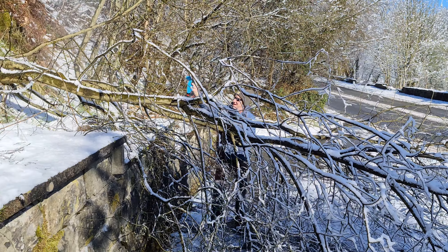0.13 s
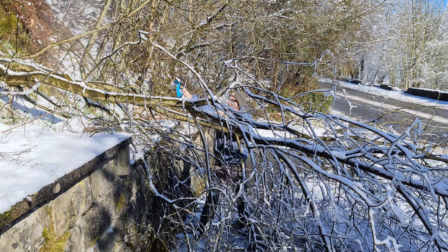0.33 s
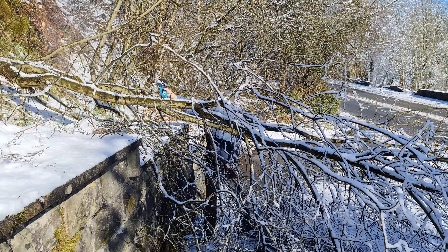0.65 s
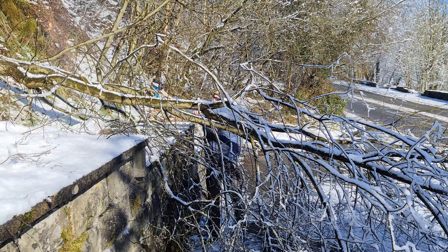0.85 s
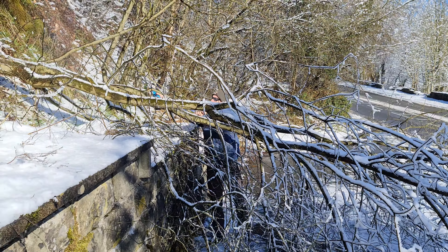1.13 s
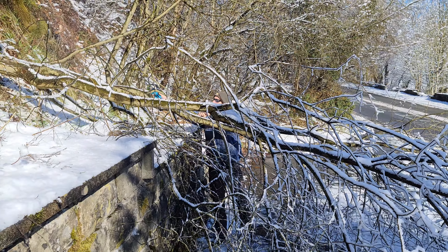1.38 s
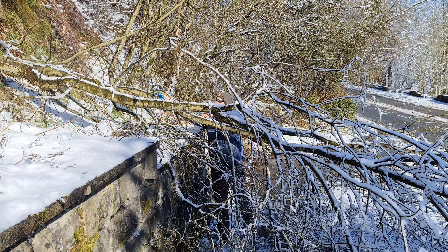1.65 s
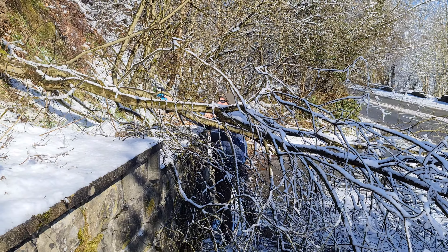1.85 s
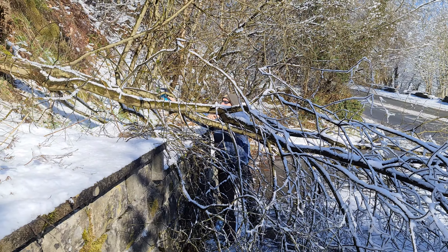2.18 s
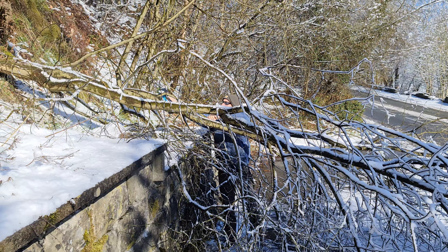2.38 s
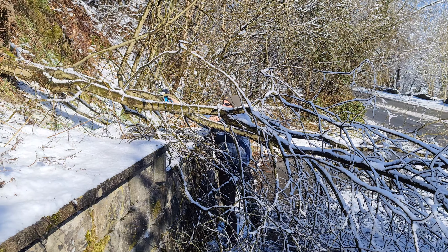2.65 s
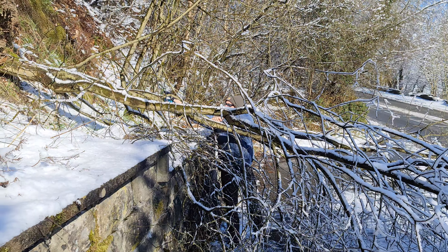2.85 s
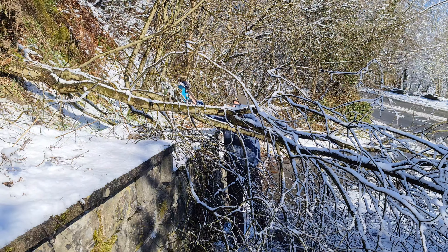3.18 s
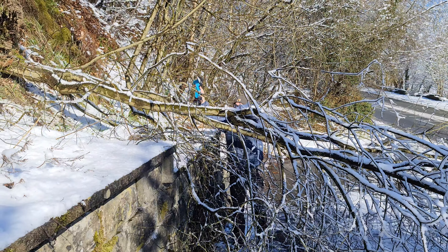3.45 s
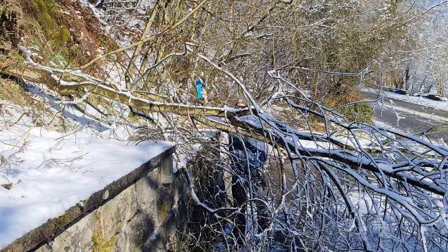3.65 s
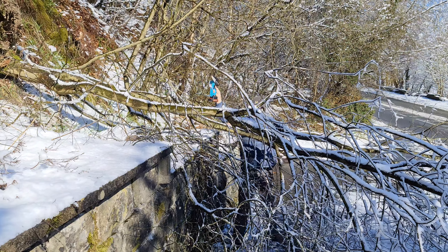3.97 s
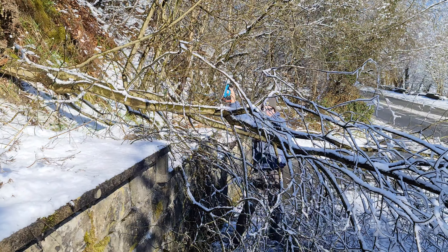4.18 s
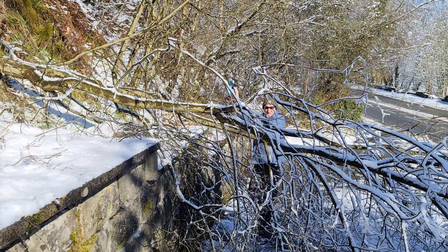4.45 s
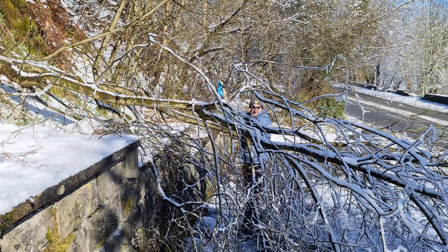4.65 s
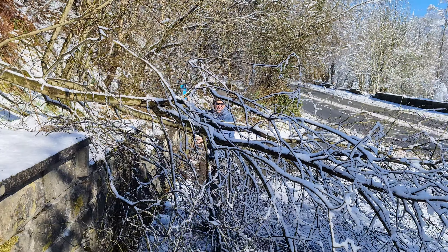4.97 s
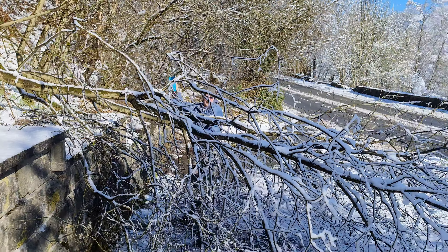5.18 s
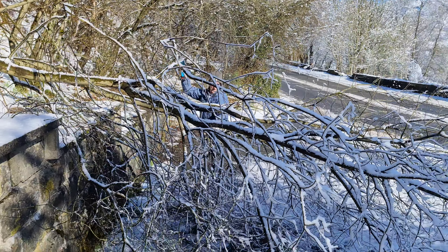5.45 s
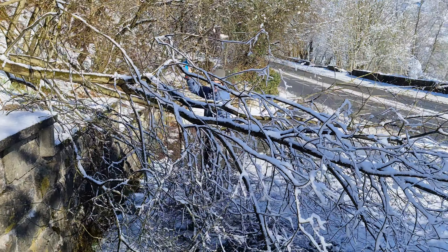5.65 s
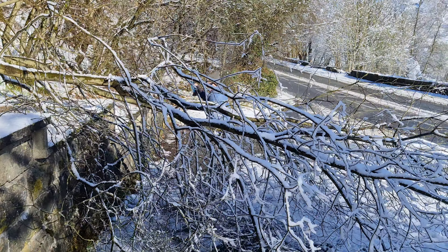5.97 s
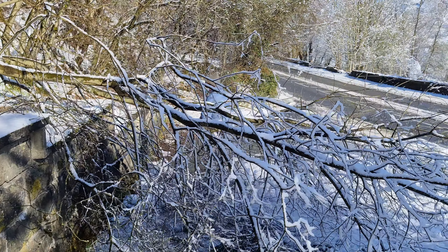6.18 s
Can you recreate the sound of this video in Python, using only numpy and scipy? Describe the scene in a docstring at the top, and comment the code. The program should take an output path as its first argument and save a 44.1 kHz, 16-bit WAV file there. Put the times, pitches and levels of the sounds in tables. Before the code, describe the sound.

Outdoors in snow, rustling steps and dull knocks lead to a brief electric chainsaw cut, a ticking coast-down, then sharp crackling branches.

```python
"""Boots crunch in snow and twigs scrape and snap beside a snowy road; a small battery chainsaw starts,
cuts a branch and coasts to a stop; then boots and twigs again.
Footsteps, twigs and wood are shaped noise: swelling grains and short band-passed bursts.
The saw is a shaft tone with a sprocket throb, plus chain noise through bar resonances and gear whine.
A peak limiter holds the loud moments."""
import sys
import numpy as np
from scipy import signal
from scipy.io import wavfile
from scipy.ndimage import uniform_filter1d, minimum_filter1d

SR = 44100
rng = np.random.default_rng(int(sys.argv[2]) if len(sys.argv) > 2 else 0)


def master(y):
    """Save y as 16-bit WAV."""
    cut = np.clip(np.atleast_2d(y).T, -1, 1)
    pcm = np.round(cut * 32767)  # scale
    wavfile.write(sys.argv[1], SR, pcm.astype(np.int16))


N = 278888
TIME = np.arange(N) / SR
FRAME, HOP = 512, 128  # short-time spectrum [samples]
HZ = np.fft.rfftfreq(FRAME, 1 / SR)[:, None]
EDGE_HZ = 16000  # upper band limit


def gain_of(db):
    """Decibels to an amplitude factor."""
    return 10 ** (np.asarray(db) / 20)


def evened(x):
    """Scales to rms 1."""
    return x / np.sqrt(np.mean(abs(x) ** 2) + 1e-20)


def smooth_noise(size):
    """Slow random curve, rms 1: white noise averaged twice over size samples."""
    noise = uniform_filter1d(rng.standard_normal(N), size=size)
    return evened(uniform_filter1d(noise, size=size))


def read(points):
    """Spectrum table on the analysis bins [dB], interpolated over log frequency."""
    hz, db = np.transpose(points)
    return np.interp(np.log(HZ + 1), np.log(hz + 1), db)


def curves(rows):
    """A gate open while the table lasts (3 ms ramps), then its columns at every sample."""
    s, *columns = np.transpose(rows)
    gate = np.clip(np.minimum(TIME - s[0], s[-1] - TIME) / .003, 0, 1)
    return gate, *(np.interp(TIME, s, column) for column in columns)


def per_frame(x):
    """One value of a curve for each short-time spectrum."""
    return np.pad(x, (0, FRAME // 2), "edge")[::HOP][:-(-N // HOP) + 1]


def band(hz, width_hz):
    """Resonance curve, 1 at its centre."""
    return 1 / (1 + (2 * (HZ - hz) / width_hz) ** 2)


def colour(x, gain, patchy_db=0.):
    """Shapes the short-time spectrum by a gain of rms 1 in each frame, with drifting patches."""
    spectra = signal.stft(x, nperseg=FRAME, noverlap=FRAME - HOP)[2]
    gain = gain / np.sqrt(np.mean(gain ** 2, axis=0))
    patches = uniform_filter1d(rng.standard_normal(spectra.shape), size=8, axis=0)
    patches = evened(uniform_filter1d(patches, size=14, axis=1))
    shaped = spectra * gain * gain_of(patchy_db * patches)
    return signal.istft(shaped, nperseg=FRAME, noverlap=FRAME - HOP)[1][:N]


def grains(per_s, spread_db, hiss):
    """Clicks at random moments, a few of them large, plus hiss (rms relative to the clicks)."""
    size = gain_of(spread_db * np.minimum(rng.exponential(1, N), 5)) * rng.choice([-1, 1], N)
    clicks = evened(size * (rng.random(N) < per_s / SR))
    return evened(clicks + hiss * rng.standard_normal(N))


def bursts(clicks, t60_s):
    """Each click sets off fresh noise that dies away."""
    decay = gain_of(-120 / (t60_s * SR))  # of power, per sample
    power = signal.lfilter([1], [1, -decay], clicks ** 2)
    return evened(np.sqrt(power) * rng.standard_normal(N))


def puff(t60_s, size=1500):
    """One burst of noise that dies away."""
    return rng.standard_normal(size) * gain_of(-60 * np.arange(size) / SR / t60_s)


def blows(rows, breadth, size=1500):
    """Band-passed bursts with a sharp onset; short ones are broader, long ones narrower."""
    usual_t60_s = np.median([row[3] for row in rows])
    out = np.zeros(N + size)
    for s, peak_db, hz, t60_s in rows:
        spread = 1.02 + max(breadth - 1, 0) * (usual_t60_s / max(t60_s, .004)) ** 1.3
        edges_hz = [hz / spread, min(hz * spread, EDGE_HZ)]
        noise = puff(max(t60_s, .002), size) + 2.15 * puff(0.0018, size)
        burst = signal.sosfilt(signal.butter(2, edges_hz, "band", fs=SR, output="sos"), noise)
        out[round(s * SR):][:size] += gain_of(peak_db) * burst / abs(burst).max()
    return out[:N]


# spectrum of the still air: (frequency [Hz], relative density [dB])
AIR = [(15, -52), (25, -5), (185, 1.5), (353, 2.5), (1370, -11), (1990, -11.5), (2480, -14.5),
       (10400, -16.5), (13200, -21), (16000, -30)]
AIR_DB = -38.5  # rms


def still_air():
    """Steady noise, strongest in the low range."""
    noise = colour(rng.standard_normal(N), gain_of(read(AIR)), patchy_db=.8)
    return gain_of(AIR_DB) * evened(noise)


# packing snow: (frequency [Hz], relative density [dB])
CRUNCH = [(15, -57), (25, -21), (129, 2.5), (209, -4), (255, 1), (475, 2), (629, 0), (1120, -4),
          (1370, -11), (3000, -19.5), (3900, -63), (6600, -120)]
# twigs and cloth: (frequency [Hz], relative density [dB])
SCRAPE = [(290, -18), (500, -10), (1130, -4), (1760, -4), (3750, -5), (4400, -8), (8700, -4.5), (12900, -6),
          (14600, -9), (15600, -24), (16200, -55)]
# movements through snow and twigs; rise and fall are floored at 3 ms:
# (full from [s], rise [s per 10 dB], hold [s], fall [s per 10 dB], crunch level [dB],
#  scrape level [dB], darkening of the scrape [dB per octave], swish pitch [Hz])
RUSTLES = [(0.199, 0.14, .02, -0.03, -21.5, -16, 0, 8100), (0.304, 0.2, 0.16, 0.13, -21.5, -16, 0.5, 4550),
           (0.545, 0.22, .06, 0.03, -22.5, -25, 1, 5000), (0.696, 0.1, .01, 0.11, -23, -30, -1, 4500),
           (0.822, 0, 0.052, 0.08, -23, -27, 0.5, 5060), (.97, .05, .05, .05, -26, -34, -1, 5200),
           (1.045, .03, .02, .06, -24.5, -30, -1, 5000), (1.132, .003, .01, -0.0066, -24, -15, -1, 5000),
           (1.157, 0.5, .04, .1, -30, -34.5, 0, 5000), (1.224, .03, .05, 0.05, -29.5, -30.5, 1, 4000),
           (1.338, .1, 0.018, .15, -38.5, -38, 1, 4400), (3.97, 0.09, 0.037, 0.1, -26, -22, 0.5, 4700),
           (4.125, 0.06, 0.1, 0.38, -24.5, -20.5, .5, 4900), (4.259, 0.13, 0.12, 0.01, -22, -18, 1, 5500),
           (4.41, 0.04, 0.069, 0.3, -27.5, -32, 5.5, 4000),
           (4.757, 0.02, .06, 0.06, -32.5, -16.5, 0.5, 4500),
           (4.892, 0.04, 0.041, -0.04, -20, -19.5, 3, 3500),
           (4.945, 0.1, 0.056, .03, -30, -18.5, 1.5, 3800), (5.035, -0.06, 0.014, 0.01, -45, -13, -1, 5950),
           (5.156, -0.04, .01, -0.17, -32.5, -24, -0.5, 6200),
           (5.205, .006, 0.027, .04, -23.5, -18, -0.5, 6000), (5.306, 1.2, 0.15, .2, -50, -31.5, 0.5, 5600),
           (5.5, .04, .02, .05, -23, -17, 2, 3000), (5.57, .06, .05, .1, -28, -22, 1, 5000),
           (5.645, .06, .045, 0.1, -28, -19, .5, 4500), (5.828, -0.06, .01, .018, -15, -15.5, 2, 4650),
           (5.909, 0, 0.048, 0.04, -24.5, -17.5, -1.5, 5650),
           (5.966, .05, 0.12, 0.07, -29.5, -18, 0.5, 5250), (6.174, 0.26, .16, 0.6, -34, -22.5, 1, 4360)]
SWISH_DB, SWISH_WIDTH = -2, 0.45  # gain; width as a share of the pitch


def moves():
    """Snow packs down in clumped low grains; twigs and cloth crackle and hiss with a broad swish."""
    crunch = evened(colour(grains(450, 2.0, 0.68), gain_of(read(CRUNCH)), patchy_db=0.5))
    crackle = evened(bursts(grains(500, 3.3, 0), 0.023) + 1.28 * rng.standard_normal(N))
    packing, brushing, dark, swish = np.zeros((4, N)) + 1e-20
    for s, rise, hold, fall, crunch_db, scrape_db, dark_db, swish_hz in RUSTLES:
        before = (s - TIME) / max(rise, .003)
        after = (TIME - s - hold) / max(fall, .003)
        swell_db = -10 * np.maximum(0, np.maximum(before, after))
        power = gain_of(2 * (swell_db + scrape_db))
        packing = packing + gain_of(2 * (swell_db + crunch_db))
        brushing = brushing + power
        dark = dark + power * dark_db
        swish = swish + power * swish_hz
    # overlapping movements share one tilt and swish, weighted by power
    dark_db = per_frame(dark / brushing)
    swish_hz = per_frame(swish / brushing) + 1
    tilt = gain_of(read(SCRAPE) - dark_db * np.log2((HZ + 100) / 5000))
    swish_gain = 1 + gain_of(SWISH_DB) * band(swish_hz, SWISH_WIDTH * swish_hz)
    scrape = colour(crackle, tilt * swish_gain, patchy_db=1.22)
    return np.sqrt(packing) * crunch + np.sqrt(brushing) * scrape


# weight comes down on branch and snow: (time [s], peak [dB], pitch [Hz], t60 [s])
THUDS = [(.553, -14, 170, 0.032), (2.655, -8, 198, .07), (2.74, -14.5, 135, 0.11),
         (3.98, -18.5, 200.3, 0.073), (4.153, -12, 238, 0.036), (5.835, -10, 230, .06)]


def thuds():
    """Low narrow bursts of noise."""
    return blows(THUDS, breadth=1.245, size=4000)


# dull knocks of wood and packed snow: (time [s], peak [dB], pitch [Hz], t60 [s])
KNOCKS = [(.224, -12, 337, .028), (.256, -12, 540, .03), (.49, -7, 530, .04), (.62, -11, 420, .025),
          (.688, -7, 330, .03), (.7335, 0, 700, .015), (.747, -11, 500, .02), (.835, -9, 610, .02),
          (.852, -2, 330, .018), (.886, -13, 340, .03), (1.133, -4, 670, .07), (1.168, -13, 1100, .014),
          (1.435, -23, 446, .03), (1.687, -8, 1100, .04), (4.036, -14, 452, .035), (4.891, -9, 500, .035),
          (4.903, -4, 960, .02), (4.953, -10, 377, .032), (5.143, -19, 371, .05), (5.224, -8, 620, .018),
          (5.5, -11, 770, .03), (5.509, -9, 1110, .03), (5.727, -9, 800, .016), (5.768, -18, 320, .03),
          (5.831, -2.5, 880, .03), (5.8665, 0, 820, .016), (5.92, -6, 470, .025), (5.932, -12, 700, .02),
          (5.99, -11, 900, .018)]


def knocks():
    """Short mid-range bursts of noise."""
    return blows(KNOCKS, breadth=1.325, size=3000)


# snaps of twigs: (time [s], peak [dB], centre [Hz], t60 [s])
SNAPS = [(0.2614, -7, 2610, 0.017), (0.4897, -7, 5320, 0.022), (0.691, -8, 2920, 0.024),
         (0.7203, -16, 2480, 0.022), (0.8142, -15, 4670, 0.028), (0.8334, -7, 5010, 0.024),
         (0.852, -6, 4030, 0.032), (0.8874, -12.5, 4320, 0.022), (1.1318, -5.5, 9530, 0.024),
         (1.1692, -9, 4560, 0.012), (1.2263, -15.5, 3670, 0.022), (4.0937, 3, 4280, 0.041),
         (4.1121, -7, 2870, 0.022), (4.1706, -5, 8120, 0.019), (4.198, 3.5, 4450, 0.014),
         (4.3284, -1, 11600, 0.027), (4.355, -7, 4970, 0.024), (4.6197, -11, 2740, 0.027),
         (4.6947, -8, 5700, 0.022), (4.7395, 1.5, 5450, 0.017), (4.7577, -4, 3630, 0.019),
         (4.776, 1, 7330, 0.022), (4.796, -4, 6170, 0.022), (4.8282, -4, 3430, 0.024),
         (4.8738, 10, 9000, 0.022), (4.8918, 2, 2970, 0.027), (4.9035, 3, 2030, 0.024),
         (4.9198, 3.5, 3290, 0.024), (4.9498, 2.5, 6390, 0.022), (4.9683, -5.5, 1980, 0.022),
         (4.9731, -0.5, 2900, 0.019), (4.987, 1.5, 3800, 0.022), (5.0011, 4, 3800, 0.022),
         (5.026, 3, 6300, 0.016), (5.037, -5.5, 12500, 0.022), (5.0444, 0.5, 12400, 0.022),
         (5.231, -6.5, 9810, 0.022), (5.469, -6, 5930, 0.026), (5.5019, -5, 3870, 0.017),
         (5.5384, -4.5, 2210, 0.02), (5.6363, 3, 9980, 0.041), (5.8294, -8, 7920, 0.022),
         (5.8654, -8, 5870, 0.022), (5.8905, 0, 11300, 0.0095), (6.0294, -2.5, 10300, 0.027),
         (6.0752, 2.5, 8640, 0.022), (6.107, -6, 4400, 0.017)]
# safety catch, trigger, first bite of the gears: (time [s], peak [dB], centre [Hz], t60 [s])
TRIGGER = [(1.632, -21.5, 5780, .02), (1.663, -17.5, 3850, 0.032), (1.6842, 1, 3500, 0.013)]


def snaps_and_trigger():
    """Breaking twigs and the saw's switch parts: brief, bright, broad bursts."""
    return blows(SNAPS + TRIGGER, breadth=1.81)


# rasp of the teeth: (frequency [Hz], relative density [dB])
RASP = [(350, -30), (600, -10), (806, -3), (1720, -3.5), (1950, 2), (3030, -4.5), (3320, -1), (5340, -5),
        (9000, -19), (11700, -38), (19800, -120)]
# thrum of the branch: (frequency [Hz], relative density [dB])
THRUM = [(30, -16), (60, -12), (100, -15), (150, -3), (310, -7.5), (400, 8), (500, -4.5), (820, -8),
         (1500, -15), (2000, -43)]
# teeth in the wood, ending in the last tear: (time [s], rasp level [dB], thrum level [dB])
CUT = [(1.98, -27, -31), (2.02, -16, -32), (2.2, -15.5, -20.5), (2.28, -23, -25.5), (2.37, -15, -21),
       (2.64, -12, -22.5), (2.69, -8.5, -15), (2.72, -13, -30), (2.75, -17, -18), (2.795, -12.5, -26),
       (2.81, -25, -33), (2.84, -15.5, -39)]


def cut():
    """Teeth tear chips from the wood (decaying bursts) and shake the branch (low grains)."""
    gate, rasp_db, thrum_db = curves(CUT)
    chips = bursts(grains(570, 2.9, 0), 0.058)
    rasp = evened(colour(chips, gain_of(read(RASP)), patchy_db=0.5))
    thrum = evened(colour(grains(300, 1.9, 0.72), gain_of(read(THRUM)), patchy_db=1.5))
    return gate * (gain_of(rasp_db) * rasp + gain_of(thrum_db) * thrum)


# metallic clicks of the chain, one as the cut ends, the rest as it coasts down: (time [s], peak [dB])
TICKS = [(2.8236, 1.5), (3.5182, 1), (3.5619, 2), (3.6301, 1), (3.6605, 0), (3.696, 0), (3.7535, -1),
         (3.8277, 3.5), (3.8621, 0), (3.903, -3), (3.928, -11), (3.9544, -7), (3.9969, -1.5), (4.0048, -4),
         (4.0221, -5.5), (4.0457, 0), (4.0544, 1), (4.0644, -1)]
TICK_HZ, TICK_T60_S = 6600, 0.022


def chain_ticks():
    """Metallic clicks, all with the same pitch and decay."""
    rows = [(s, peak_db, TICK_HZ, TICK_T60_S) for s, peak_db in TICKS]
    return blows(rows, breadth=1.455)


# trigger, spin-up, cut and coast: (time [s], shaft tone [Hz], tone level [dB], load of the wood [0-1])
SHAFT = [(1.69, 320, -28, .7), (1.75, 375, -33, .4), (1.8, 416, -22.5, 0), (1.87, 439, -21.5, 0.05),
         (1.95, 450.5, -15.5, 0.2), (2.05, 437.3, -26, 0.18), (2.12, 380.4, -24, 0.7),
         (2.22, 346.4, -25.5, .8), (2.3, 371.5, -25, 0.73), (2.4, 360, -21, 1), (2.52, 359.6, -23.5, .9),
         (2.65, 345.8, -36.5, 0.88), (2.78, 331, -31, 0.73), (2.84, 395, -34, 0), (2.9, 430.4, -32.5, 0.03),
         (2.97, 439.4, -27.5, 0.15), (3.05, 416, -29, 0.02), (3.3, 312, -45.5, 0), (3.8, 174.9, -64, 0.04),
         (4.12, 70, -68.5, 0)]
WOBBLE_FREE_HZ, WOBBLE_LOAD_HZ = 4.06, 26.13  # rms pitch waver: free, added at full load
FLUTTER_FREE, FLUTTER_LOAD = 0.25, 0.6  # rms level flutter as a share: free, added at full load
THROB_DB, THROB_LOAD_DB, THROB_LIFT_DB = -65.5, 30, 14.5  # base; added at full load; once lifted out
# the housing favours the third order once the saw is lifted out
THIRD_DB, THIRD_HZ, THIRD_WIDTH_HZ, LIFT_S = -34, 1069.7, 393, 2.9


def motor():
    """Shaft tone and third order, shaken into a band by load, over the lumpy throb of the sprocket."""
    gate, hz, db, load = curves(SHAFT)
    shake, lumps = smooth_noise(300), smooth_noise(600)
    wobble_hz = (WOBBLE_FREE_HZ + WOBBLE_LOAD_HZ * load) * shake
    turns = np.cumsum(hz + wobble_hz) / SR
    lifted = np.clip((TIME - LIFT_S) / .1, 0, 1)
    housing = 1 / (1 + (2 * (3 * hz - THIRD_HZ) / THIRD_WIDTH_HZ) ** 2)
    third = gain_of(THIRD_DB) * lifted * housing
    tone = gain_of(db) * np.sin(2 * np.pi * turns) + third * np.sin(6 * np.pi * turns)
    flutter = 1 + (FLUTTER_FREE + FLUTTER_LOAD * load) * lumps
    throb_gain = gain_of(THROB_DB + THROB_LOAD_DB * load + THROB_LIFT_DB * lifted)
    # the sprocket turns at a third of the shaft tone
    throb = throb_gain * evened(.7 + lumps) * np.sin(2 * np.pi * turns / 3)
    return np.sqrt(2) * gate * (tone * flutter + throb)


# chain noise: (frequency [Hz], relative density [dB])
RATTLE = [(88, -52), (150, -30), (368, -5.5), (800, -3), (1590, 2.5), (1830, -1.5), (2450, -5), (4850, -5),
          (6380, -3.5), (10000, -5.5), (12300, -6.5), (14000, -7), (14800, -7), (15600, -20), (16200, -50)]
# ringing of bar and housing: (centre [Hz], width [Hz], then gain [dB] when facing
#  0: raised, 1: in the cut, 2: lifted out, 3: lowered)
BAR = [(2456, 360, 3, 7, 4, 3.5), (3210, 780, 0, 9.5, 2, -9), (3900, 290, -5, 10.5, -4, 1),
       (4460, 470, -14, 10, 6, -22), (6030, 560, 2, 2, 8.5, 2), (6570, 150, -20, 0, 4, 1.5),
       (7180, 660, 2.5, -3.5, -7, 2), (8500, 1100, -4, 4.5, -5, 3), (9470, 420, -2, 7, 7.5, -8),
       (10420, 360, 1.5, 9.5, 2.5, -8), (11230, 1140, -7, 2, 0.5, 0), (12800, 740, -6, 2, 5, 4)]
# noisy gear mesh bands: (order of the shaft tone [ratio], width [Hz], gain [dB])
GEARS = [(10.3, 350, 11), (16.6, 400, 6), (21.2, 400, 9), (26.9, 400, 7), (31.3, 450, 8)]
# gear whine over the rattle: gain [dB] for facings 0-3
WHINE_DB = [-16, -20, -5.5, -11]
WHINE_FADE_DB_PER_OCTAVE, TOP_HZ = 8, 470  # fade below top speed
KNOCKS_FAST, KNOCKS_SLOW = 0.28, 0.81  # share of separate knocks at top speed and at rest
ECHO_SHARE = 0.19  # echo from the trunk beside the saw
# running chain: (time [s], rattle level [dB], facing [0-3, clamped], echo lag [ms])
CHAIN = [(1.684, -10, .5, 0.29), (1.75, -6, 0, .285), (1.95, -6, 0, 0.29), (2.05, -9.5, 1, 0.29),
         (2.3, -10.5, 1, 0.29), (2.75, -13, 1.3, 0.27), (2.82, -15.5, 3, 0.3), (2.9, -10.5, 2.5, 0.27),
         (3.1, -11, 2, 0.29), (3.3, -11.5, 2.5, 0.34), (3.5, -13, 3, 0.321), (3.75, -14.5, 3, 0.37),
         (3.9, -17.5, 6, 0.36), (4.0, -20, 3, 0.36), (4.09, -33, -1, 0.35)]


def chain():
    """Links knock on sprocket and bar in step with the shaft; the metal rings and the gears whine."""
    gate, db, facing, lag_ms = curves(CHAIN)
    shaft_hz = curves(SHAFT)[1]
    share = np.clip(KNOCKS_SLOW + (KNOCKS_FAST - KNOCKS_SLOW) * shaft_hz / TOP_HZ, 0, 1)
    uneven = np.exp(.35 * evened(uniform_filter1d(rng.standard_normal(N), size=150)))
    steps = np.diff(np.floor(np.cumsum(shaft_hz * uneven) / SR), prepend=0)
    links = steps * gain_of(3.5 * rng.standard_normal(N))
    separate = bursts(links / np.sqrt(shaft_hz), 0.015)
    drive = share * separate + (1 - share) * grains(6000, 0.36, 1.0)

    sides, facing, shaft_hz = np.arange(4), per_frame(facing), per_frame(shaft_hz)
    ring = sum(gain_of(np.interp(facing, sides, side_db)) * band(hz, width_hz)
               for hz, width_hz, *side_db in BAR)
    mesh = sum(gain_of(mesh_db) * band(order * shaft_hz, width_hz)
               for order, width_hz, mesh_db in GEARS)
    whine_db = np.interp(facing, sides, WHINE_DB)
    whine_db = whine_db + WHINE_FADE_DB_PER_OCTAVE * np.log2(shaft_hz / TOP_HZ)
    shape = gain_of(read(RATTLE)) * (.5 + ring + gain_of(whine_db) * mesh)
    echo = abs(1 + ECHO_SHARE * np.exp(-2j * np.pi * HZ * per_frame(lag_ms) / 1000))
    return gate * gain_of(db) * evened(colour(drive, shape * echo, patchy_db=1.5))


def scatter(near):
    """Short diffuse return from the bank and trees: a decaying noise tail."""
    tail = np.r_[np.zeros(200), puff(.12, size=6000)]
    return gain_of(-20) * signal.oaconvolve(near, tail / np.linalg.norm(tail))[:N]


def scene():
    """All near sources and their scatter over the still air."""
    handling = moves() + thuds() + knocks() + snaps_and_trigger()
    saw = cut() + chain_ticks() + motor() + chain()
    near = handling + saw
    return (still_air() + scatter(near) + near)[None]


def record(dry):
    """Microphone low cut, look-ahead peak limiter, then the upper band limit."""
    dry = signal.sosfilt(signal.butter(2, 62, "high", fs=SR, output="sos"), dry)
    room_db = np.minimum(-20 * np.log10(abs(dry[0]) + 1e-9) - .3, 0)
    rise_db = TIME * 840.0  # recovery, 840 dB per second
    lowest_db = minimum_filter1d(room_db, size=801)
    held_db = np.minimum.accumulate(lowest_db - rise_db) + rise_db
    limited = dry * gain_of(uniform_filter1d(np.minimum(held_db, 0), size=401))
    lowpass = signal.firwin(511, EDGE_HZ, window=("kaiser", 9), fs=SR)
    return signal.oaconvolve(limited, lowpass[None], "same")


dry = scene()
out = record(dry)
master(out)
```